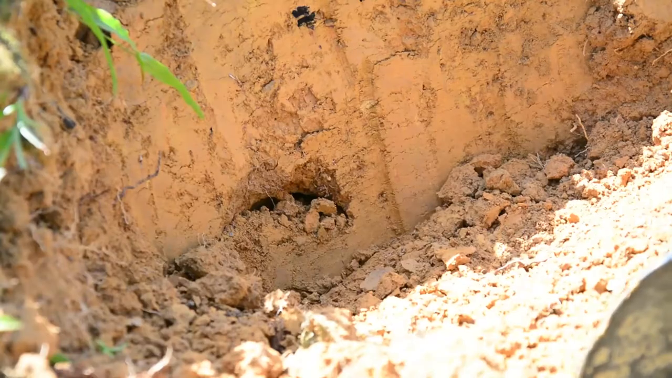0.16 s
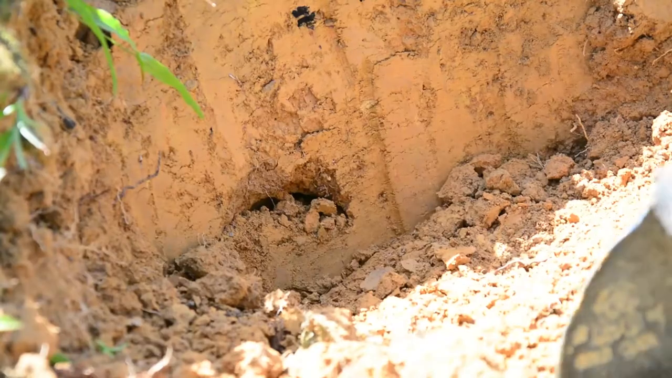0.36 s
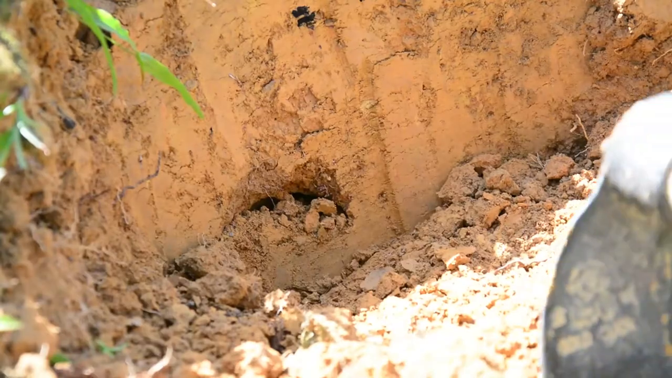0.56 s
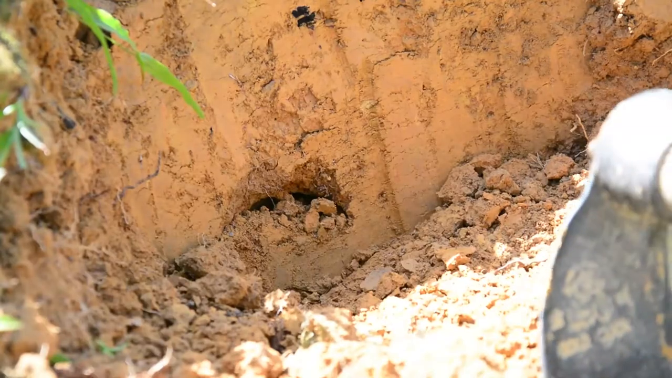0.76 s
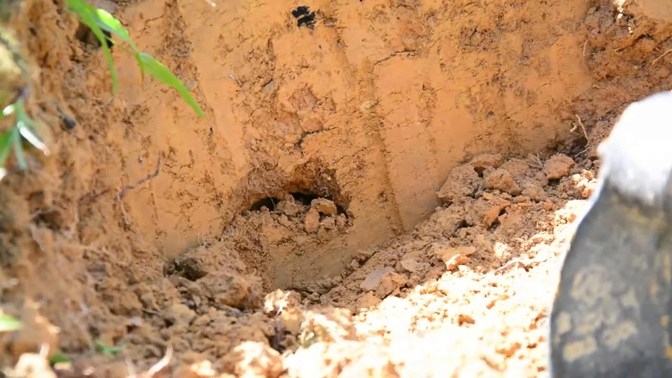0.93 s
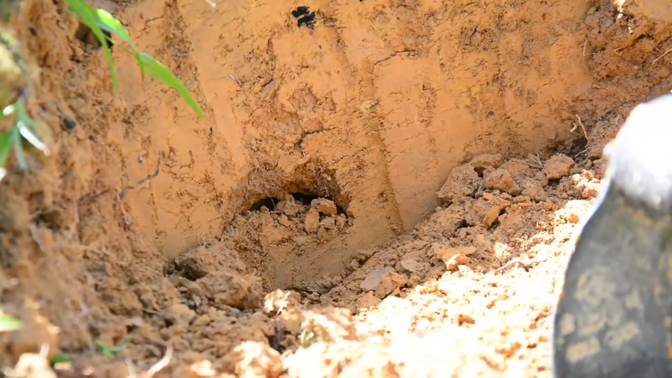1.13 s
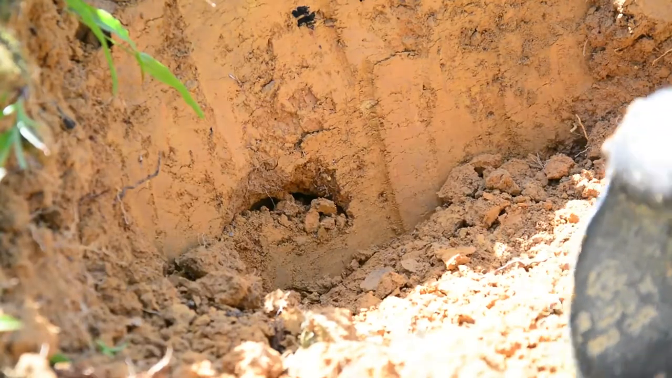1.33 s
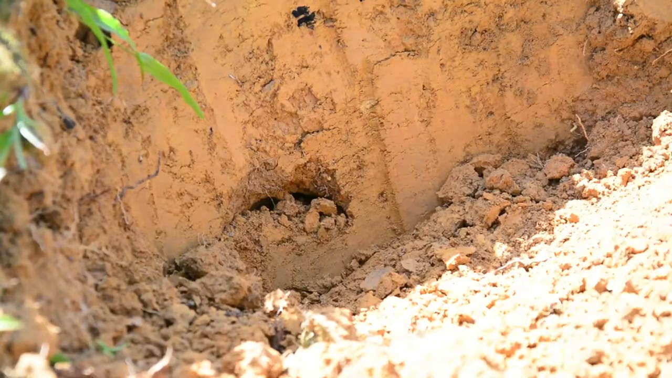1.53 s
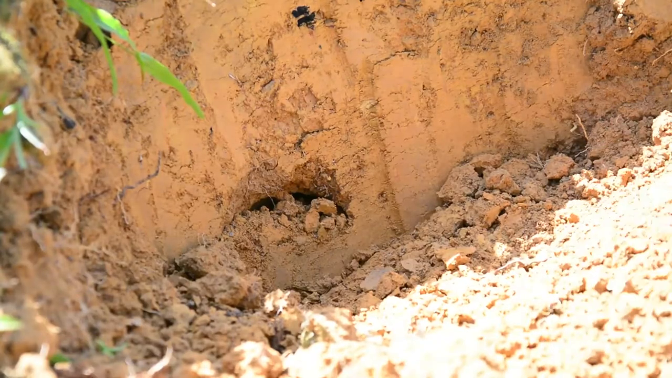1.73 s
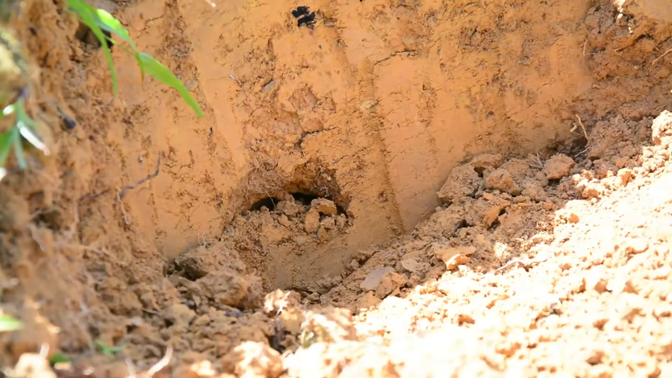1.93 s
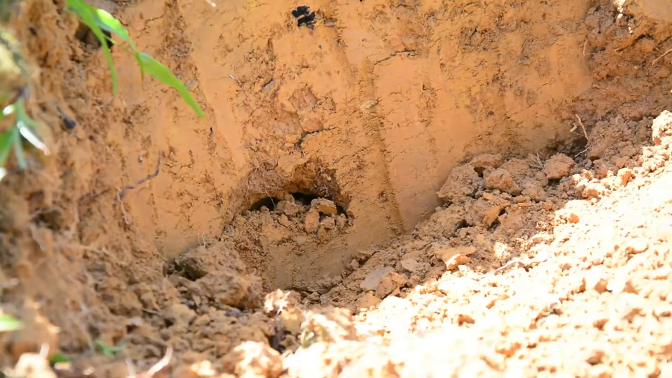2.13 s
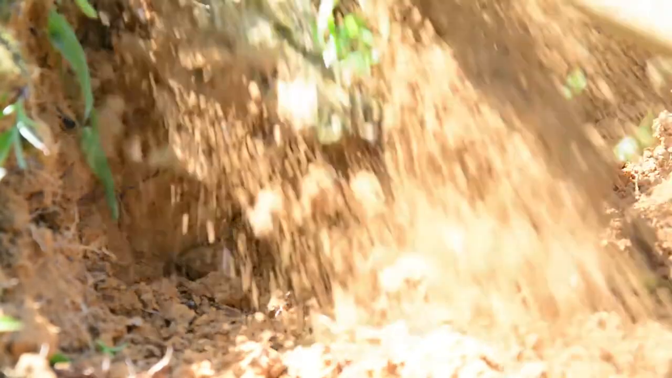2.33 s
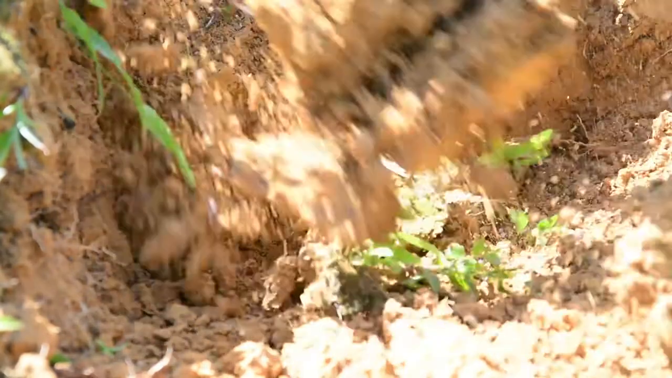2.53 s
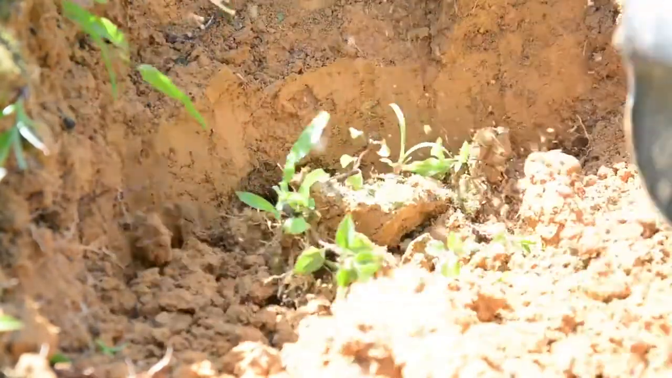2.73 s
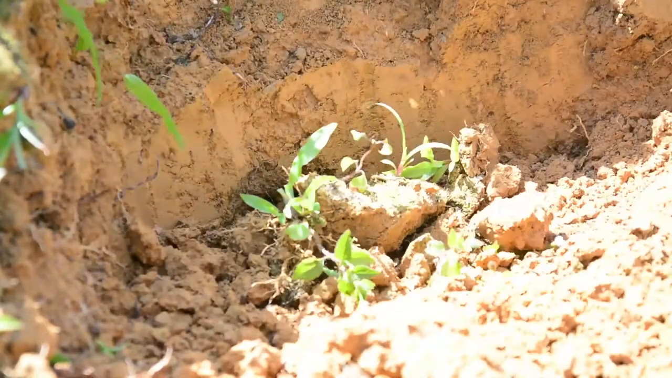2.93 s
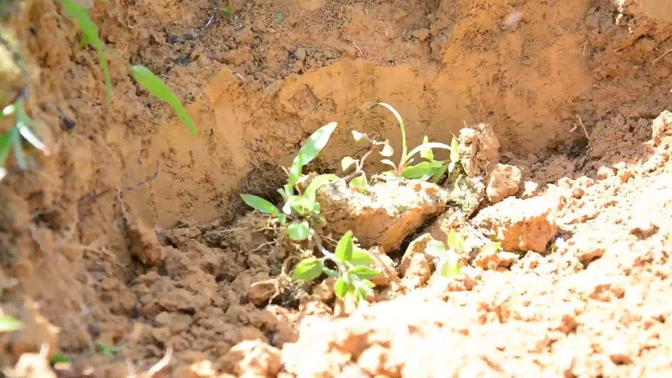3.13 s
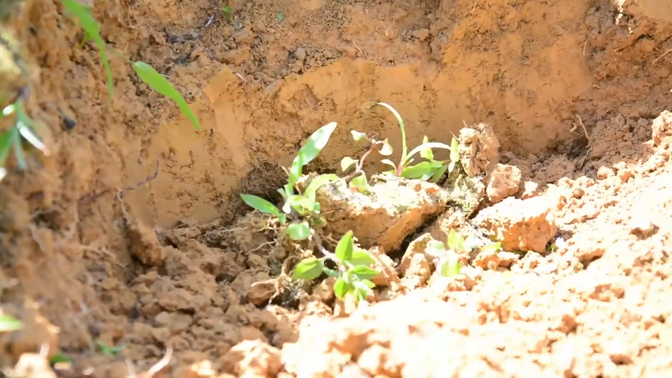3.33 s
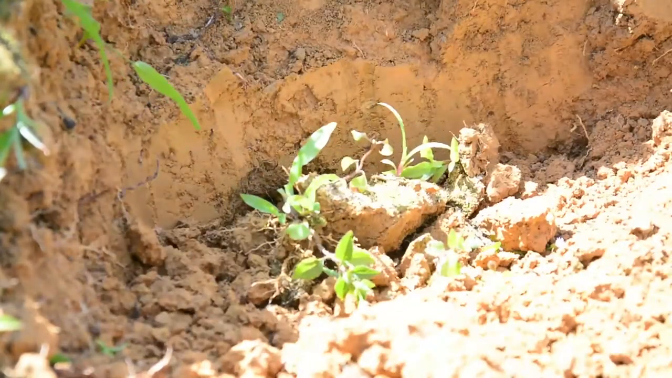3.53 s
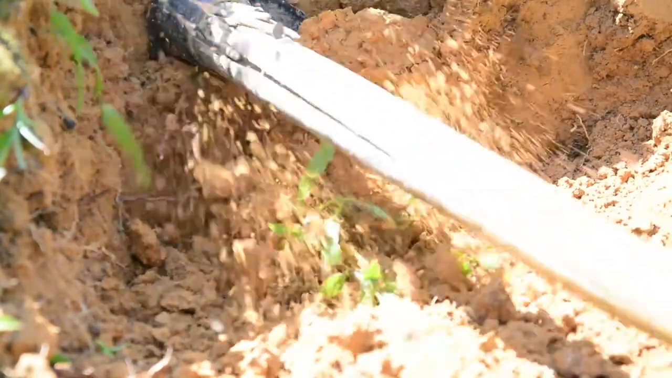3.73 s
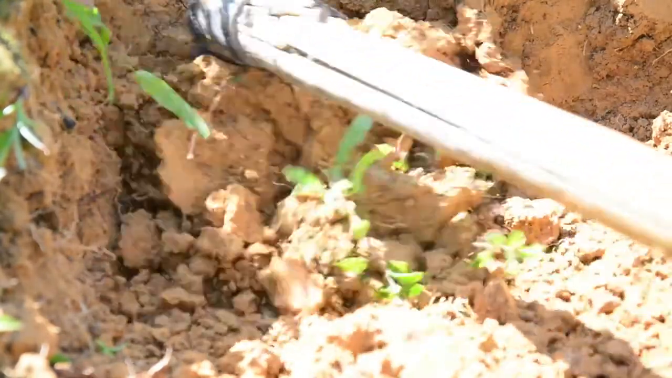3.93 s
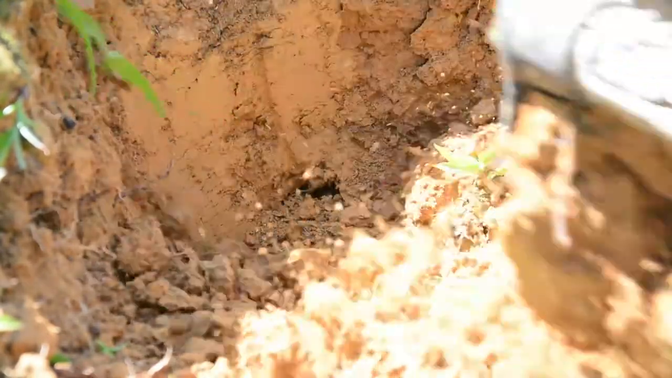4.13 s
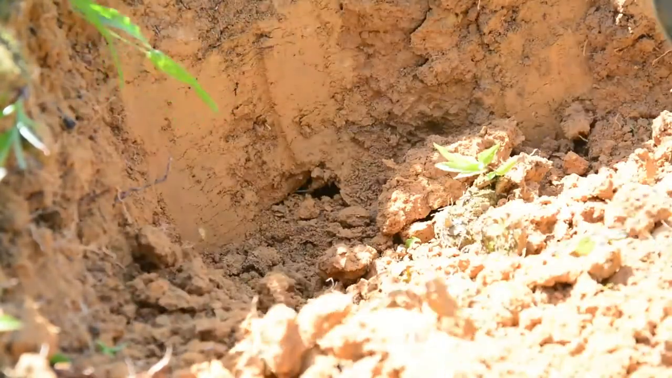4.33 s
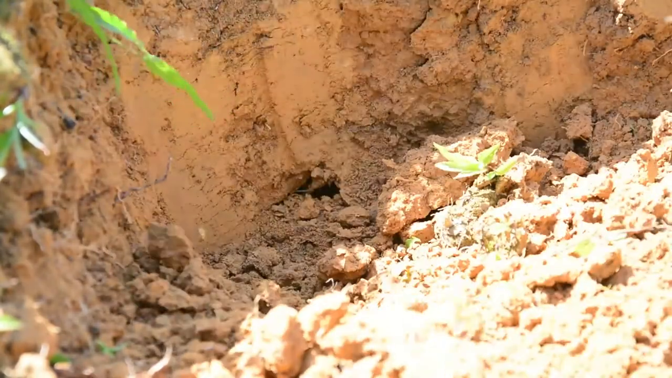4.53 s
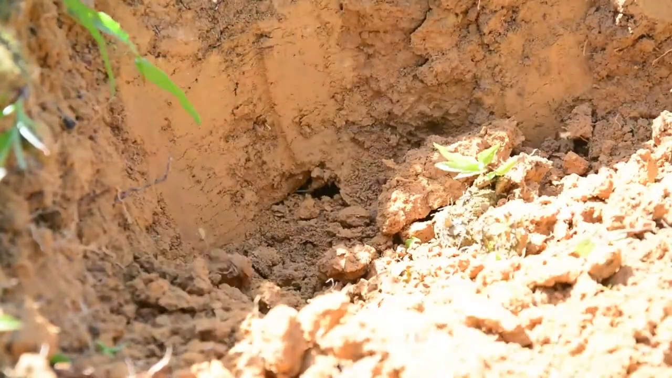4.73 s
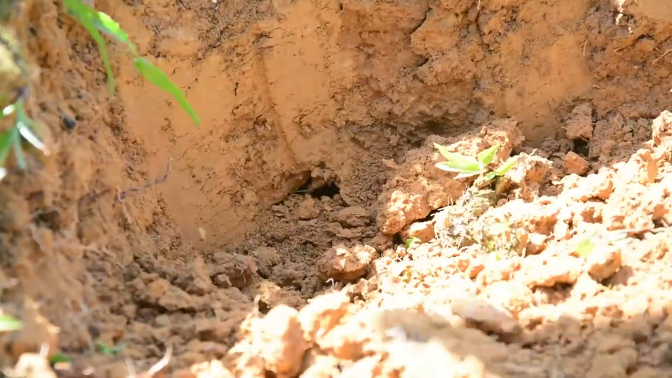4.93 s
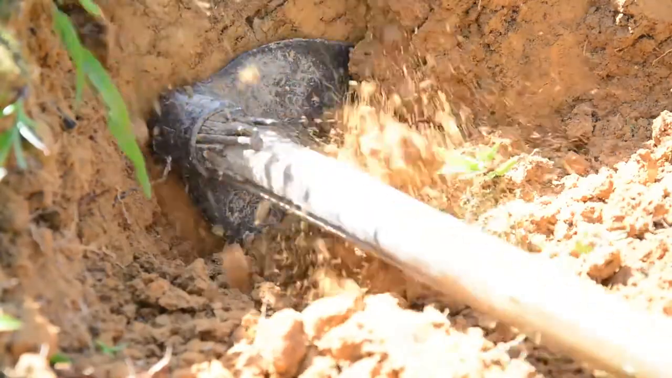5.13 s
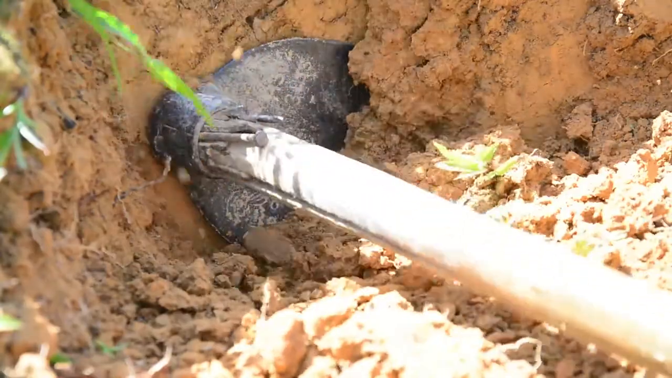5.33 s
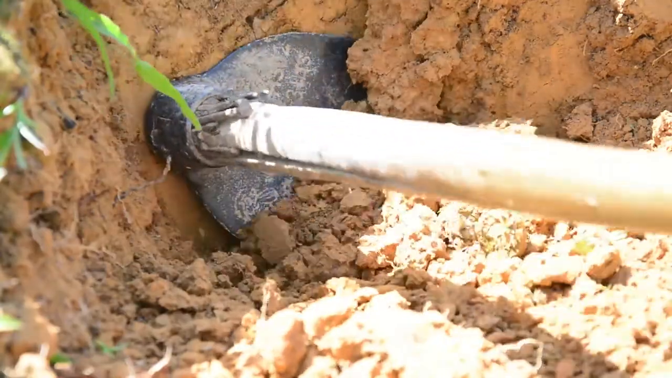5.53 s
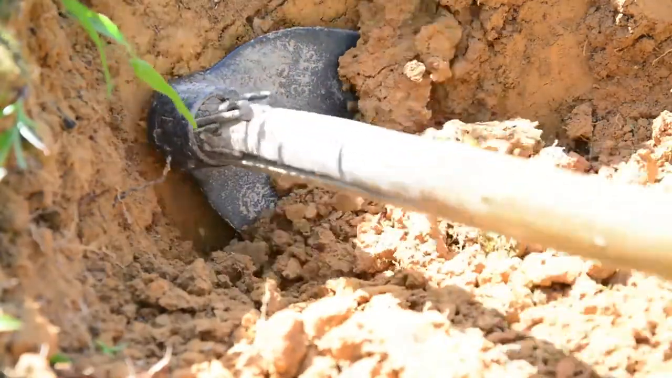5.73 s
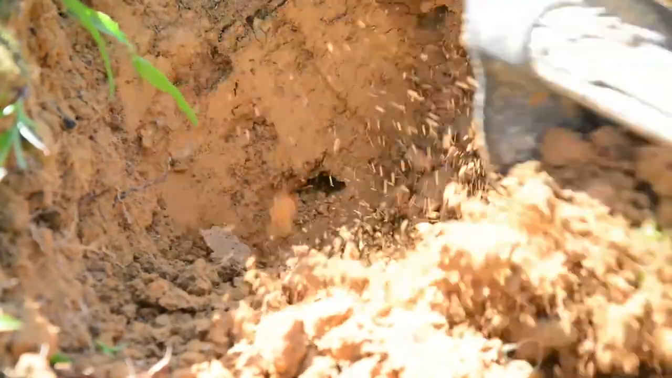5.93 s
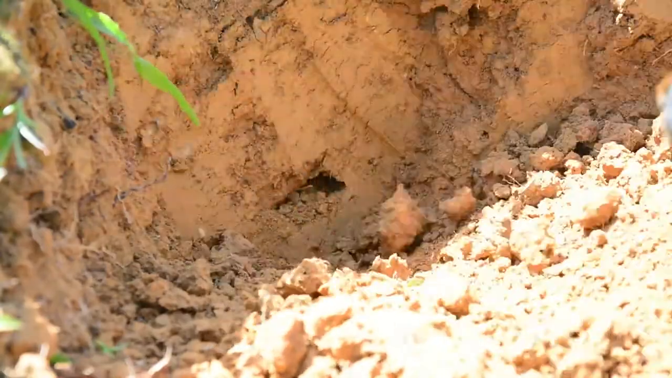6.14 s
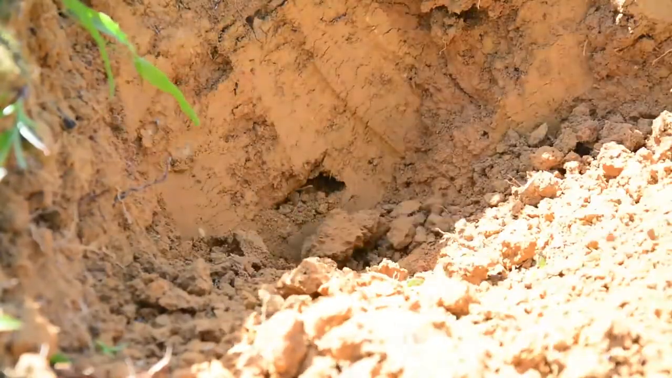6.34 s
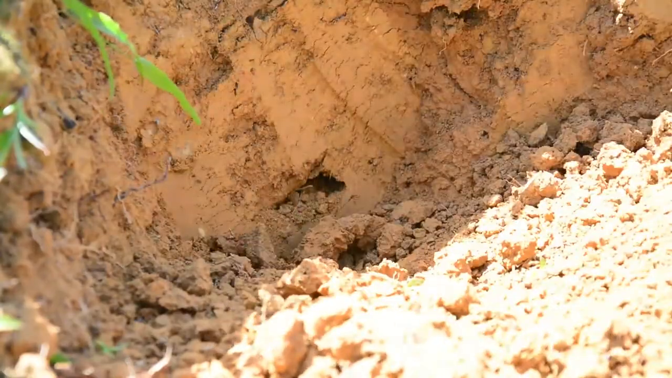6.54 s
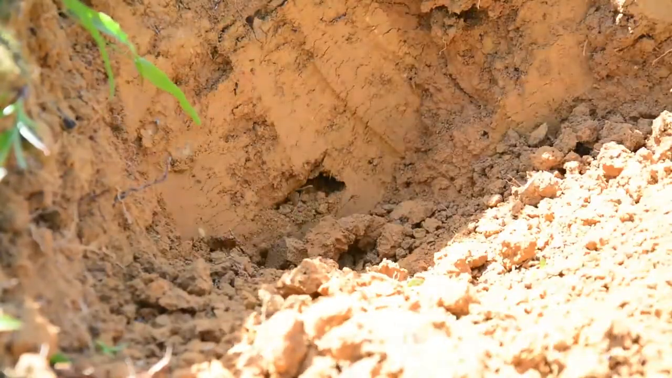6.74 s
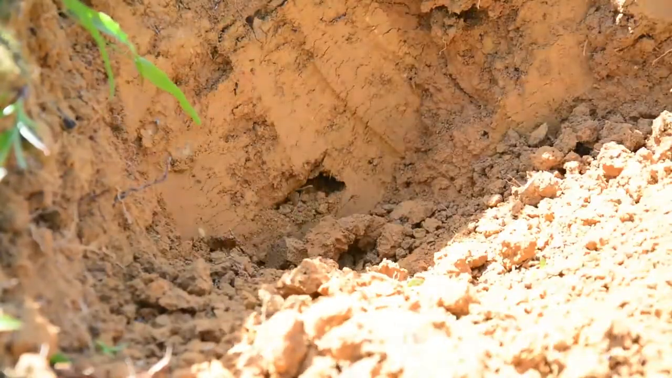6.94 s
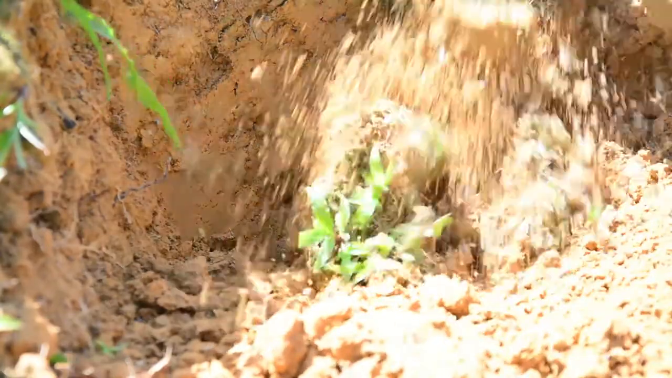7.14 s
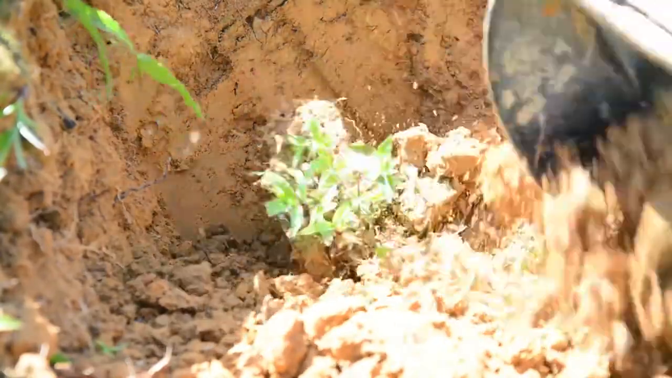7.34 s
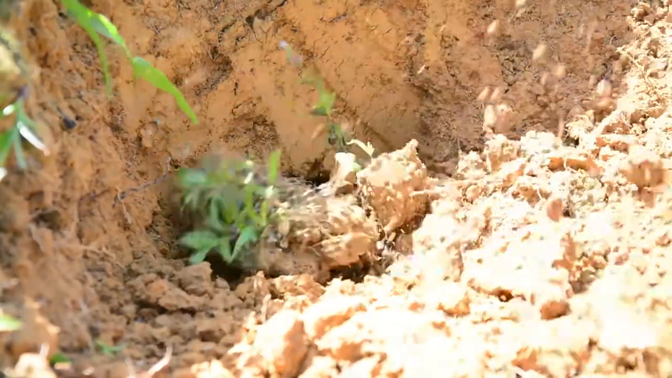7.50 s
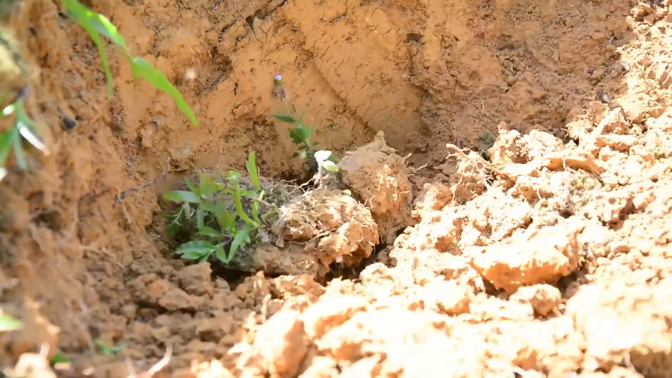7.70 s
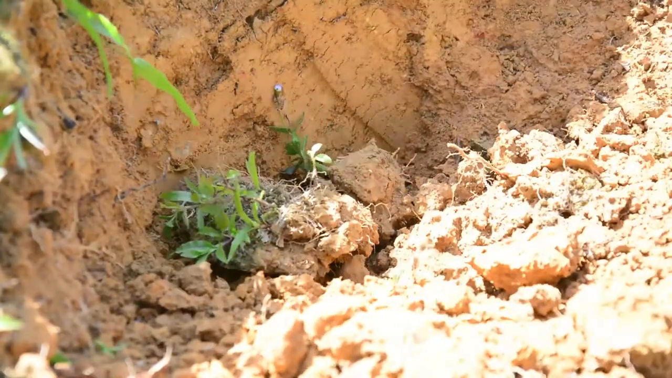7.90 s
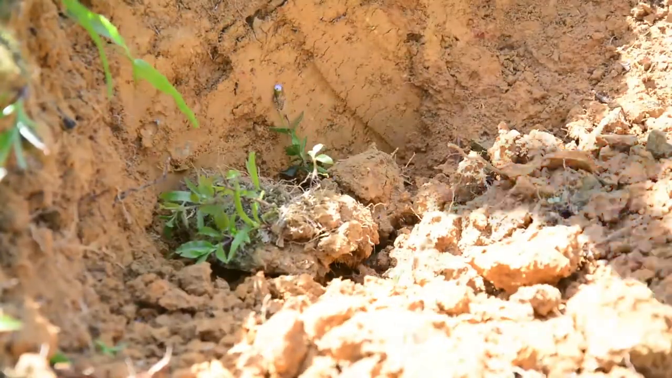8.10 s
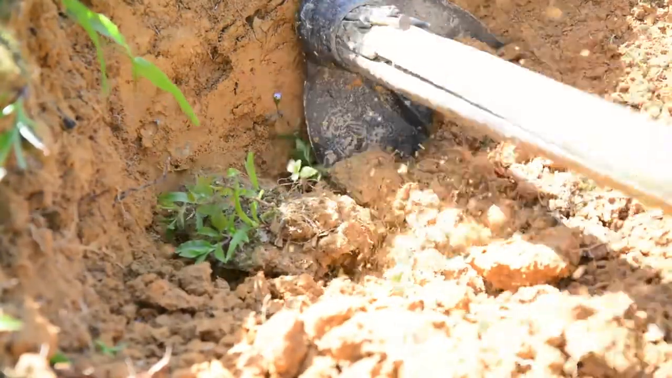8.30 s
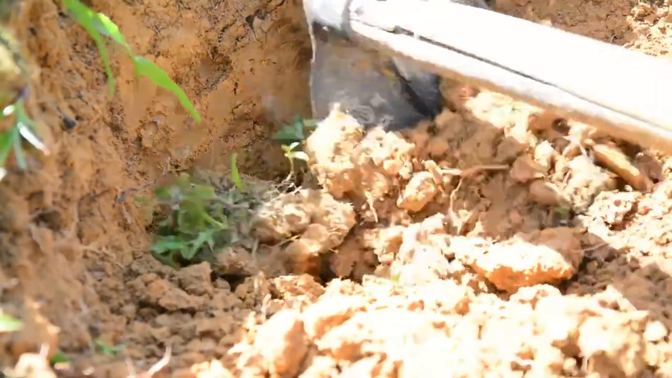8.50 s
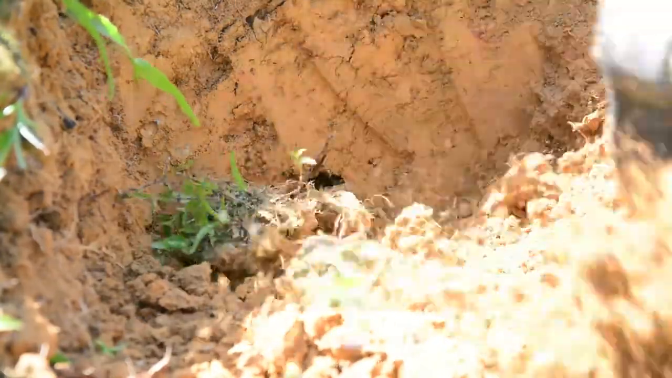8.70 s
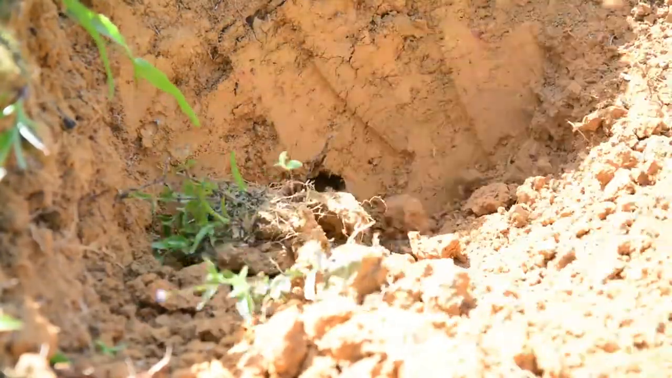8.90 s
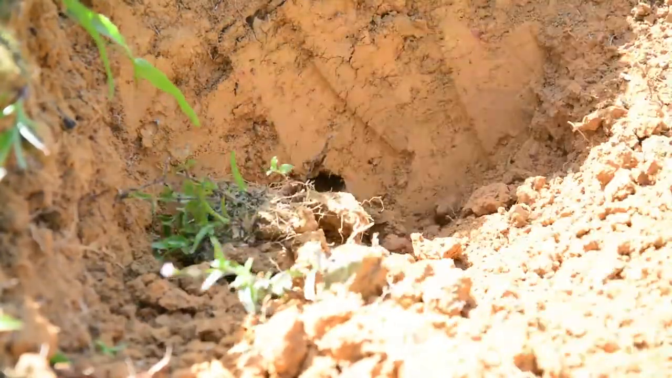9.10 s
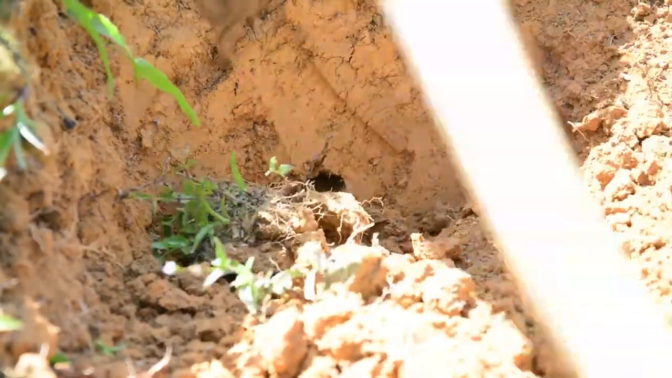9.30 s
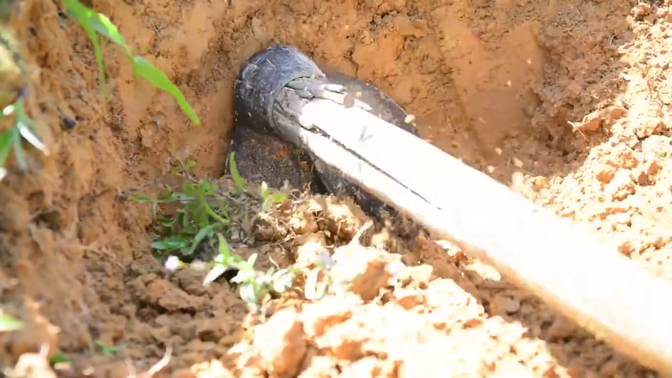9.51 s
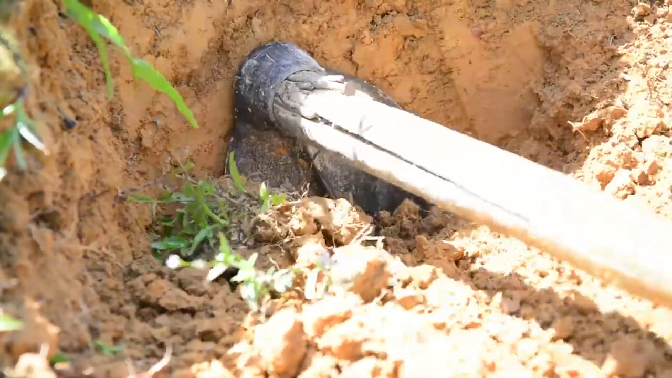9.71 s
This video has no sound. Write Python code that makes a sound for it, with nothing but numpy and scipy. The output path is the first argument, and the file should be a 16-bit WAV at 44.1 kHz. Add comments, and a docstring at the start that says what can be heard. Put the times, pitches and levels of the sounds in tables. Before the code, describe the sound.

Soft outdoor air opens with loose soil sliding and scraping close by, and small clods ticking down, busiest in the first two seconds. A far single-cylinder engine, at first a blurred wash, becomes a clear chug by about 1.6 seconds, roughly thirteen cycles a second, slowing slightly towards the end. At 2.2 seconds a hoe chops into dry clay very close to the microphone: a quick cluster of snaps, crunch, thud and brief damped steel ring. More strokes fall at about 3.7, 5.0, 7.0, 8.2 and 9.4 seconds; the one at 8.2 is hardest and overloads, the last is softer and more broken up. Grit spills around every blow, with clods and short scrapes between, and a faint dull answer from the slopes. A distant bird whistles thinly, falling at 5.2 to 5.5 seconds, then briefly near 6.1 and 7.5.

```python
"""Soft outdoor air is heard first, with a far engine whose chugging soon grows clear and loose soil that trickles.
The air is filtered noise; the slow single-cylinder engine is a cycle of knocks ringing its casing, plus a throb.
Soil slides and scrapes as streams of tiny random impacts; crumbs land as short decaying tones with some noise.
Then a hoe chops six times into dry clay: each stroke is a few quick bites, made of a snap and noise bursts
that ring the blade, close enough to overload the microphone. A far bird whistles in gliding tones."""
import sys
import numpy as np
from scipy import signal
from scipy.fft import rfft, irfft, next_fast_len
from scipy.io import wavfile
from scipy.ndimage import map_coordinates

SR = 44100
rng = np.random.default_rng(int(sys.argv[2]) if len(sys.argv) > 2 else 0)


def store_pcm(level_fs):
    """Save levels as 16-bit WAV."""
    pcm = np.round(np.clip(level_fs, -1, 1) * 32767).astype(np.int16)
    wavfile.write(sys.argv[1], SR, np.atleast_2d(pcm).T)


N = 434826  # length of the scene [samples]


def amp(db):
    """Turn decibels into a plain multiplier."""
    return 10 ** (np.asarray(db) / 20)


def unit(x):
    """Scale a sound to an average strength (rms) of 1."""
    return x / np.sqrt(np.mean(x ** 2) + 1e-20)


def along(points, hz):
    """Read a curve of (frequency [Hz], value) points on a logarithmic frequency axis."""
    point_hz, value = np.transpose(points)
    return np.interp(np.log(hz + 1), np.log(point_hz + 1), value)


def curves(rows):
    """Join the rows into one value per sample for each column after the time."""
    s, *columns = np.transpose(rows)
    return [np.interp(np.arange(N) / SR, s, column) for column in columns]


def wobble(rate, count=N):
    """Draw a smooth random curve through `rate` random points a second."""
    points = rng.standard_normal(int(count * rate / SR) + 4)
    return map_coordinates(points, [np.arange(count) * rate / SR])


def filtered(x, response):
    """Shape the spectrum of a sound by a (complex) response of frequency."""
    n = x.shape[-1]
    padded = next_fast_len(n + 4096)  # room for the filter to ring out
    spectrum = rfft(x, padded) * response(np.fft.rfftfreq(padded, 1 / SR))
    return irfft(spectrum, padded)[..., :n]


def resonance(f, hz, width):
    """Response of one way an object rings: 1 at its own pitch, less on either side."""
    return 1j * f * width / (hz * hz - f * f + 1j * f * width)


# how alike left and right are in noise: (frequency [Hz], likeness [1 = same, 0 = unrelated])
LIKENESS = [(600, 0.99), (1200, 0.99), (2500, 0.98), (4500, 0.64), (8000, .1), (15000, 0.031)]


def noise(spectrum, count=N, grain=1):
    """Stereo noise of rms 1, broken up by `grain`: nearly mono in the bass, unrelated in the treble."""
    def response(f):
        turn = np.arccos(np.clip(along(LIKENESS, f), -1, 1)) / 2
        return amp(along(spectrum, f)) * np.array([np.cos(turn), np.sin(turn)])

    mid, side = filtered(grain * rng.standard_normal((2, count)), response)
    return unit(np.array([mid + side, mid - side]))


def add(track, s, sound):
    """Mix a sound into the track, starting at s seconds."""
    i = max(round(s * SR), 0)
    track[:, i:i + sound.shape[-1]] += sound[:, :N - i]


def burst(carrier, rise, t60, tail_db=-60):
    """Noise swells and dies by 60 dB in t60 seconds, with a tail three times as long; rms 1 over its first 6 ms."""
    t = np.arange(carrier.shape[-1]) / SR
    decay = amp(-60 * t / t60) + amp(tail_db - 20 * t / t60)
    y = carrier * (1 - np.exp(-t / rise)) * decay
    return y / np.sqrt(np.mean(y[:, :round(.006 * SR)] ** 2))


def snap(hz, life, count):
    """A breaking or landing clod gives a few cycles of tone, strongest after `life` seconds."""
    t = np.arange(count) / SR
    envelope = t / life * np.exp(1 - t / life)
    return envelope * np.sin(2 * np.pi * hz * t + rng.uniform(0, 2 * np.pi))


STROKE_GAP_S = .3  # a longer pause between bites begins a new stroke


def strokes():
    """Find the middle of each stroke [s]: bites close together belong to one swing."""
    s = np.array(BITES)[:, 0]
    starts = np.flatnonzero(np.diff(s) > STROKE_GAP_S) + 1
    return [group.mean() for group in np.split(s, starts)]


# tone of the outdoor air: (frequency [Hz], relative level [dB per Hz])
AIR_TONE = [(15, -55), (25, -38), (101, -15.5), (240, -10), (648, -5), (782, -2.5), (871, -8), (1050, 0),
            (1200, -4.5), (1620, -8), (2300, -13), (2700, -13.5), (4380, -20), (9300, -25.5), (15500, -25)]


def air():
    """Steady filtered noise, its level drifting very slightly."""
    return amp(-50.0 + 0.21 * wobble(2.8)) * noise(AIR_TONE)


# engine speed: (time [s], speed [cycles per second])
ENGINE_SPEED = [(0, 14.012), (1.5, 13.276), (3.6, 13.509), (4.3, 13.178), (5.4, 13.857), (6.2, 13.091),
                (7.2, 13.237), (8.3, 12.899), (9.0, 12.251), (9.86, 11.832)]
# knocks in one engine cycle: (place in the cycle [0-1], decay [cycles], relative level [dB])
ENGINE_KNOCKS = [(.81, .11, 0), (.02, .1, -1), (.17, .07, -5), (.6, .06, -14)]
# tone of the engine noise: (frequency [Hz], relative level [dB per Hz])
ENGINE_TONE = [(150, -13), (400, 1), (800, 5), (2500, 0.5), (3300, -7.5), (6000, -11), (12000, -31)]
# ringing of the engine's casing: (pitch [Hz], width [Hz], relative level [dB])
CASING_MODES = [(795, 20, 1.5), (927, 50, -3.5), (1062, 63, 6.5), (1440, 220, 0), (1896, 150, 0.5),
                (2070, 42, -4.5), (2246, 113, 1.5), (2610, 95, -12), (3040, 26, -33)]
# how clearly the knocking carries: (time [s], level [dB])
KNOCKING_CARRIES = [(0, -27.5), (1.6, -5), (2.6, -3), (5.3, -2.5), (6.2, -2.5), (9.86, -1)]


def engine():
    """The engine knocks a few times a cycle and rings its casing; its exhaust throbs once a cycle."""
    speed, = curves(ENGINE_SPEED)
    cycle = np.cumsum(speed) / SR
    knocks = 0
    for place, decay, db in ENGINE_KNOCKS:
        since = (cycle - place) % 1  # cycles since this knock
        knocks = knocks + amp(db) * np.exp(-since / decay) * (1 - np.exp(-since / 0.01))

    def casing(f):
        return 0.37 + sum(amp(db) * resonance(f, hz, width) for hz, width, db in CASING_MODES)

    knocking = noise(ENGINE_TONE, N, knocks * amp(1.3 * wobble(25)))
    clatter = amp(-45) * unit(filtered(knocking, casing))
    puffs = unit(amp(7.5 * np.cos(2 * np.pi * cycle)))
    pipe = 1.04 * np.sin(2 * np.pi * 8 * cycle + 0.77 * wobble(17))
    rumble = noise([(25, -28), (55, -4), (78, -10), (105, -2.0), (130, 1),
                    (180, -16.0), (400, -36), (1000, -80)])
    exhaust = pipe + 0.67 * rumble
    carry_db, = curves(KNOCKING_CARRIES)
    # echoes off the slopes smear the knocks into a steady wash
    wash = amp(-55) * unit(filtered(noise(ENGINE_TONE), casing))
    return amp(carry_db) * clatter + wash + amp(-64.5) * puffs * exhaust


SLIDE_EDGE_DB = 4.5  # a slide is this much weaker at the ends of its swelling and settling


def swell(s, rise, fall):
    """A rounded swell of height 1 at time s."""
    t = np.arange(N) / SR - s
    return amp(-SLIDE_EDGE_DB * np.minimum((t / np.where(t < 0, rise, fall)) ** 2, 20))


def grainy(spectrum, rate, rough_db):
    """A stream of tiny impacts, `rate` a second, of unequal size and in clumps; rms 1."""
    impacts = (rng.random(N) < rate / SR) * amp(rough_db * rng.standard_normal(N))
    return noise(spectrum, N, impacts * amp(2.9 * wobble(70)))


# the smallest crumbs: usual pitch, its scatter, cycles until each tick's envelope peaks
TICK_HZ, TICK_OCTAVES, TICK_CYCLES = 1248, 0.643, 0.92


def ticks(rate, rough_db):
    """Tiny crumbs land at random, `rate` a second, each with its own pitch and size; rms 1."""
    at = np.flatnonzero(rng.random(N) < rate / SR)
    pitch, size = rng.standard_normal((2, len(at), 1))
    i = np.arange(SR // 100)
    turns = TICK_HZ * 2 ** (TICK_OCTAVES * pitch) * i / SR  # cycles of tone so far
    envelope = turns * np.exp(-turns / TICK_CYCLES)
    tick = amp(rough_db * size) * envelope * np.sin(2 * np.pi * turns)
    return unit(np.bincount((at[:, None] + i).ravel(), tick.ravel(), N)[:N])


# slides, before mixing: (time of the height [s], swelling [s], settling [s], gritty body [dB], fine dust [dB])
SOIL_SLIDES = [(.38, 0.1, 0.086, -41.5, -57), (.68, 0.16, 0.23, -42, -55.5),
               (1.06, .16, 0.057, -43.5, -51.5), (1.76, 0.1, 0.17, -46, -54.5),
               (2.62, 0.47, 0.45, -46, -56.5), (3.0, 0.12, 0.14, -47.5, -51), (4.6, 0.14, .42, -46, -50.5),
               (5.9, 0.16, 0.31, -49, -65), (6.44, 0.13, 0.083, -55, -51), (7.33, .1, 0.05, -43, -69),
               (9.08, .08, 0.092, -42, -47), (9.63, 0.6, 0.084, -45, -50.5)]
# short scrapes over dry soil, before mixing: (time of the middle [s], length [s], level [dB])
SOIL_SCRAPES = [(.21, 0.024, -35), (0.359, 0.03, -29.5), (0.39, 0.033, -32.5), (0.456, 0.021, -36.5),
                (.605, 0.013, -33), (0.64, 0.067, -36.5), (0.688, 0.028, -44), (0.777, 0.022, -34.5),
                (1.009, 0.015, -38), (1.097, 0.023, -31), (3.225, 0.041, -36.5), (4.63, 0.047, -36),
                (5.889, 0.016, -35.5), (6.232, 0.038, -38), (6.46, 0.018, -38.5), (8.605, 0.039, -32),
                (9.096, 0.075, -34), (9.641, 0.071, -33)]
# tone of the gritty soil: (frequency [Hz], relative level [dB per Hz])
SOIL_TONE = [(100, -40), (200, -19), (330, -6.5), (600, -3), (900, 1), (1400, -0.5), (2200, -4), (3300, -4),
             (4300, -23), (6000, -16.5), (9000, -40)]
# tone of the fine dust, also used for the grit of landing clods: (frequency [Hz], relative level [dB per Hz])
DUST_TONE = [(1500, -20), (3500, 5.5), (5500, 1), (7500, 2.5), (10000, 2.5), (12000, -2.5), (15500, -1)]
# soil stirred around every stroke: swelling and settling time, body and dust level before mixing
SPILL_LEAD_S, SPILL_SETTLE_S, SPILL_DB, SPILL_DUST_DB = 0.061, 0.069, -45.5, -62
REST_DB, REST_DUST_DB = -57, -64  # the bank never stops trickling
RASP_DB, SCRAPE_GRIT_DB = -3.5, -9.5  # the two parts of a scrape


def soil():
    """Loose soil slides in slow swells and around each stroke, sheds tiny crumbs and scrapes in short spurts."""
    t = np.arange(N) / SR
    spills = [(s, SPILL_LEAD_S, SPILL_SETTLE_S, SPILL_DB, SPILL_DUST_DB) for s in strokes()]
    body_power, dust_power = amp(REST_DB) ** 2, amp(REST_DUST_DB) ** 2
    for s, rise, fall, db, dust_db in SOIL_SLIDES + spills:
        flow = swell(s, rise, fall)
        body_power = body_power + (amp(db) * flow) ** 2
        dust_power = dust_power + (amp(dust_db) * flow) ** 2
    body, dust = np.sqrt(body_power), np.sqrt(dust_power)
    slide = amp(-1.5) * body * grainy(SOIL_TONE, 3500, 1.6)
    slide += dust * grainy(DUST_TONE, 7000, 1.6)
    trickle = amp(-2) * body * ticks(260, 4) + amp(-10) * dust * grainy(DUST_TONE, 160, 2.5)
    push = sum(amp(db) * np.exp(-(2 * (t - s) / length) ** 2) for s, length, db in SOIL_SCRAPES)
    scrape = amp(RASP_DB) * grainy(SOIL_TONE, 2500, 2)
    scrape += amp(SCRAPE_GRIT_DB) * grainy(DUST_TONE, 3000, 3)
    return slide + trickle + push * scrape


# clods landing: (time [s], level [dB], pitch [Hz], clatter relative to that level [dB])
LANDING_CLODS = [(0.381, -17, 1190, -21), (0.598, -20, 1100, -12), (0.628, -19.5, 1190, -17),
                 (0.823, -20.5, 890, -13), (0.978, -22.5, 1010, -28), (1.062, -25.5, 1060, -10),
                 (1.097, -29.5, 689, -5), (1.296, -27, 860, -12.5), (1.427, -29.5, 834, -9.5),
                 (1.486, -13, 1320, -24.5), (1.692, -19.5, 880, -17), (1.82, -17, 650, -18),
                 (1.937, -31.5, 1540, -5), (2.719, -20.5, 530, -16), (3.184, -22, 1020, -16),
                 (3.228, -22.5, 1760, -9), (3.412, -19, 825, -11.5), (3.43, -20, 990, -22),
                 (4.622, -22, 1040, -27), (4.705, -22, 620, -25), (4.816, -22.5, 650, -16),
                 (5.686, -26.5, 1690, -11.5), (6.091, -25.5, 1730, -10.5), (6.512, -26, 1040, -17),
                 (6.938, -24, 1120, -15), (9.421, -23, 705, -8)]
CLOD_HZ = 1420  # pitch of a middling clod, landing or breaking
# knock and grit of such a landing clod, relative to its level; lower clods knock more
KNOCK_DB, KNOCK_DB_PER_OCTAVE, CRUMB_GRIT_DB = -34.5, -6.5, -34


def crumbs():
    """Small clods land with a dry tick and a short clatter; the lower ones knock more."""
    out, n = np.zeros((2, N)), SR // 10
    for s, db, hz, clatter_db in LANDING_CLODS:
        knock_db = KNOCK_DB + KNOCK_DB_PER_OCTAVE * np.log2(hz / CLOD_HZ)
        clatter = noise([(300, -36), (750, 7.5), (1800, 3), (3500, -7.0), (6000, -20), (12000, -27)], n)
        knock = noise([(80, -40), (250, 3.5), (600, 2), (1100, -42), (3000, -60)], n)
        landing = 0.6 * snap(hz, 0.00079, n)
        landing = landing + amp(clatter_db) * burst(clatter, 0.00035, 0.046)
        landing += amp(knock_db) * burst(knock, .0006, 0.042)
        landing += amp(CRUMB_GRIT_DB) * burst(noise(DUST_TONE, n), 0.00018, 0.021)
        add(out, s, amp(db) * landing)
    return out


# a soft low hum sinking in pitch after each stroke: delay to its middle, length, level
HUM_DELAY_S, HUM_S, HUM_DB = .095, .25, -57.5


def sinking_hum():
    """A soft low tone sinks in pitch after each stroke and after the loudest landing clod."""
    out, t = np.zeros((2, N)), np.arange(int(HUM_S * SR)) / SR
    loudest_clod_s = max(LANDING_CLODS, key=lambda row: row[1])[0]
    for s in strokes() + [loudest_clod_s]:
        hz = 42 + 110 * np.exp(-t / 0.081)
        tone = np.sin(2 * np.pi * np.cumsum(hz) / SR + rng.uniform(0, 2 * np.pi))
        hum = tone * amp(3.1 * wobble(77, len(t)))
        start_s = s + HUM_DELAY_S - HUM_S / 2
        add(out, start_s, amp(HUM_DB) * np.hanning(len(t))[None] * hum)
    return out


# bites of the blade:
# (time [s], level [dB], pitch of the breaking clod [Hz], thud and crack relative to the bite [dB, dB])
BITES = [(2.228, -21, 2080, -20, -15), (2.2341, -14.5, 770, -2.5, -4), (2.241, -17, 820, -6, -4),
         (3.656, -11.5, 1400, -11.5, -24), (3.6588, -10.5, 865, -9, -5.5), (5.0295, -14.5, 1860, -13, -18),
         (5.048, -8, 1960, -17.5, -6.5), (5.0547, -15, 1460, -15, -7.5), (5.063, -17.5, 870, -6, -16),
         (7.0021, -13.5, 930, -15, -18), (7.0079, -17, 1970, -8.5, -6), (8.166, -16, 3140, -16, -7),
         (8.172, -6.5, 2300, -20, -1.5), (8.1776, -6.5, 1860, -16, -6), (9.343, -29, 1540, -14, 1),
         (9.35, -15.5, 2050, -13, -4.5), (9.3573, -17, 1750, -10.5, -2.5), (9.381, -21.5, 780, -9, -16),
         (9.3865, -19.5, 1060, -4.5, -7)]
# ringing of the damped steel blade on its wooden handle: (pitch [Hz], width [Hz], relative level [dB])
BLADE_MODES = [(328, 76, -5), (940, 95, -6), (1085, 51, 3.5), (1280, 42, -8), (1420, 79, 2),
               (1850, 100, -1.5), (2610, 68, -10), (3130, 40, 2), (3500, 70, -7), (3680, 160, -6),
               (5050, 56, 7), (4760, 36, -15)]
# base crumbling time, and how much longer bigger (lower) clods crumble
CRUMBLE_T60_S, CRUMBLE_GROWS = 0.046, 0.083
GRIT_DB, GRIT_PER_CRACK = -12.5, 0.62  # a harder crack throws more grit


def hoe():
    """Each bite breaks clay: a snap at the clod's pitch, a thud, a crunch, a crack and grit, all ringing the blade."""
    out, n = np.zeros((2, N)), SR // 6
    for s, db, clod_hz, thud_db, crack_db in BITES:
        grit_db = GRIT_DB + GRIT_PER_CRACK * crack_db
        t60 = CRUMBLE_T60_S * (CLOD_HZ / clod_hz) ** CRUMBLE_GROWS
        grain = amp(3.7 * wobble(2470, n))
        thud = noise([(60, -21), (150, -23.5), (240, -4.0), (310, -3), (400, -5.5),
                      (500, 3.5), (650, -9.0), (900, -1.0), (2000, -57)], n)
        crunch = noise([(250, -11), (550, -0.5), (780, 2.5), (1400, 2.5), (2200, 3),
                        (2700, -34), (5000, -34)], n, grain)
        crunch = filtered(crunch, lambda f: .5 + resonance(f, clod_hz, 1400))
        crack = noise([(1200, -49), (2300, -1.5), (3000, -1), (4000, -5), (5200, -10.5),
                       (7000, -29.5), (12000, -43)], n, grain)
        grit = noise([(3000, -40), (6000, 3.5), (8000, -1), (11000, -4.0), (15500, 2)], n, grain)
        bite = 1.08 * snap(clod_hz, 0.0018, n) + 0.67 * burst(crunch, 0.001, 0.77 * t60, tail_db=-23)
        bite += amp(thud_db) * burst(thud, 0.0021, 1.21 * t60)
        bite += amp(crack_db) * burst(crack, 0.00014, 0.83 * t60, tail_db=-23.0)
        bite += amp(grit_db) * burst(grit, 0.00034, 0.69 * t60, tail_db=-7)
        add(out, s, amp(db) * bite)

    def blade(f):
        ringing = sum(amp(db) * resonance(f, hz, width) for hz, width, db in BLADE_MODES)
        bass_cut = (1j * f / (90 + 1j * f)) ** 2  # so small a source radiates little bass
        return (0.8 + 0.61 * ringing) * bass_cut

    return filtered(out, blade)


def hillside(x):
    """The slopes scatter a faint, bright answer: the sound is smeared by a fading tail of noise."""
    n = SR // 2
    tail = noise([(100, -13), (900, -16), (2500, -3), (6000, 10), (14000, -20)], n)
    tail = tail * amp(-60 * np.arange(n) / SR / 0.43)  # falls 60 dB in 0.43 s
    return signal.fftconvolve(x, tail / np.linalg.norm(tail[0]), axes=1)[:, :N]


# bird whistles: (time [s], length [s], start pitch [Hz], end pitch [Hz], level [dB])
BIRD_WHISTLES = [(5.18, .17, 2620, 2130, -46), (5.35, .14, 2080, 1760, -48), (6.08, .07, 3740, 3750, -51),
                 (6.08, .05, 5000, 5100, -59), (7.5, .15, 2980, 2950, -49), (7.51, .1, 3690, 3690, -58)]


def bird():
    """Thin far whistles: pure tones that glide, waver slightly and fade."""
    out = np.zeros((2, N))
    for s, length, start_hz, end_hz, db in BIRD_WHISTLES:
        n = int(length * SR)
        hz = np.linspace(start_hz, end_hz, n) * (1 + 0.0033 * wobble(74, n))
        tone = np.sin(2 * np.pi * np.cumsum(hz) / SR)
        add(out, s, amp(db) * np.hanning(n)[None] ** .5 * tone)
    return out


# one short low push at the hardest bite: (time [s], level [dB], length [s])
OVERLOAD_PUSH = (8.1797, -18, .0011)


def overload_push():
    """The overloaded microphone adds one short low push, a smooth one-sided bump, at the hardest bite."""
    s, db, length = OVERLOAD_PUSH
    return amp(db) * np.exp(-((np.arange(N) / SR - s) / length) ** 2)


def arriving(x, lead_us):
    """Sound from the right reaches the right port lead_us microseconds before the left."""
    half_lead_s = lead_us / 2 * np.array([[-1e-6], [1e-6]])  # left later, right earlier
    return filtered(x, lambda hz: np.exp(2j * np.pi * hz * half_lead_s))


WIDE_ABOVE_HZ = 9300  # the left-right difference of the close blade weakens below this


def focused(x):
    """A close, small source differs between the ports mainly in the treble."""
    mid, side = (x[0] + x[1]) / 2, (x[0] - x[1]) / 2
    side = filtered(side, lambda hz: hz / np.hypot(hz, WIDE_ABOVE_HZ))
    return np.array([mid + side, mid - side])


RIGHT_LEAD_US = 19  # the soil and the hillside lie a little to the right


def scene():
    """The hoe straight ahead, the soil beside it, the engine, the bird and the air far behind."""
    blows = hoe()
    around = air() + engine() + soil() + crumbs() + amp(-28.5) * hillside(blows) + bird()
    return focused(blows) + sinking_hum() + overload_push() + arriving(around, RIGHT_LEAD_US)


TOP_HZ = 15950  # nothing passes from here up


def record(dry):
    """The hardest bites flatten smoothly at full scale, then the highest treble is cut away."""
    clipped = dry / (1 + np.abs(dry) ** 8) ** (1 / 8)
    return filtered(clipped, lambda hz: hz < TOP_HZ)


dry = scene()
out = record(dry)
store_pcm(out)
```